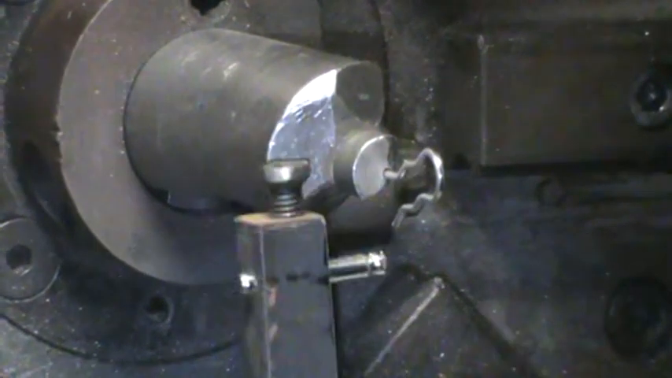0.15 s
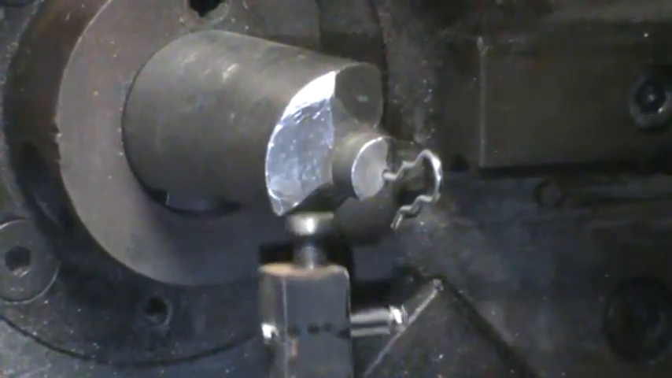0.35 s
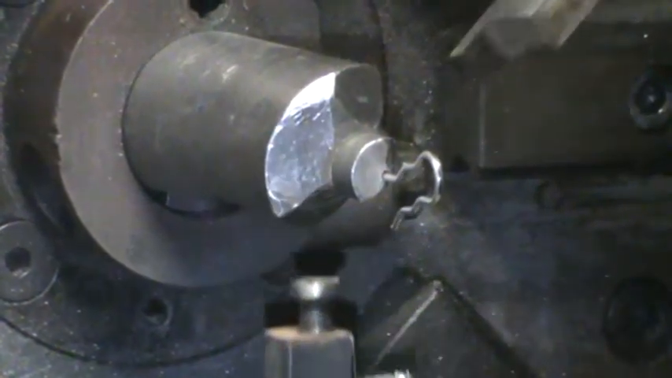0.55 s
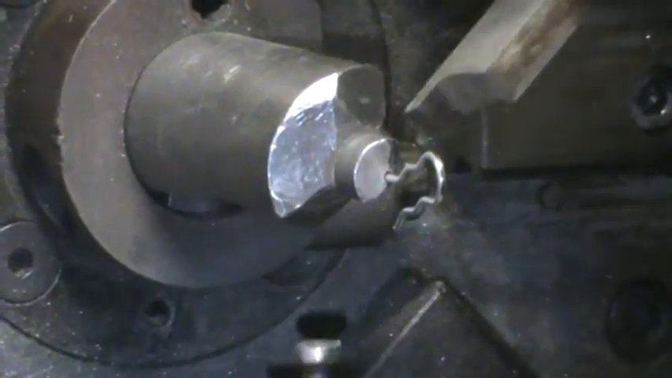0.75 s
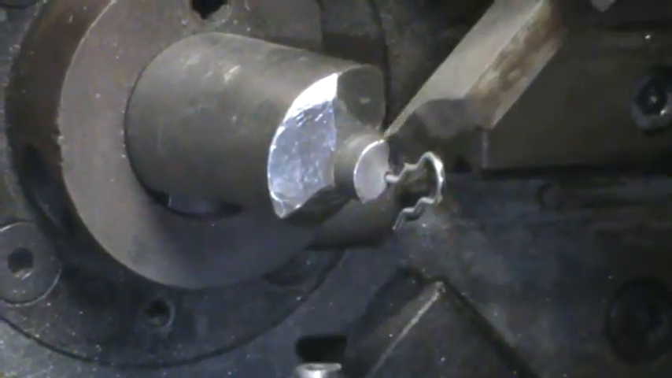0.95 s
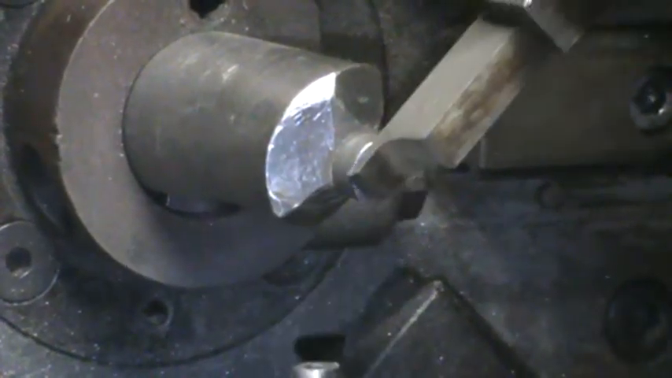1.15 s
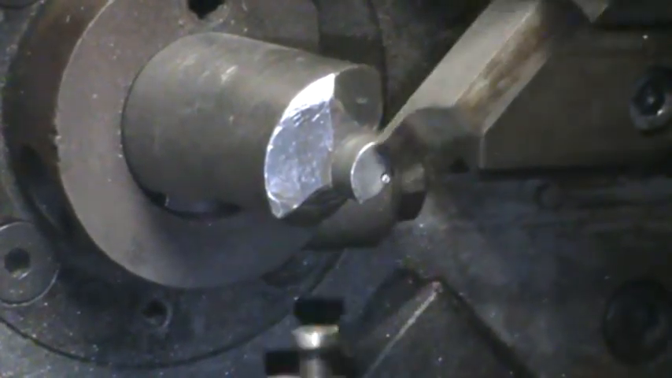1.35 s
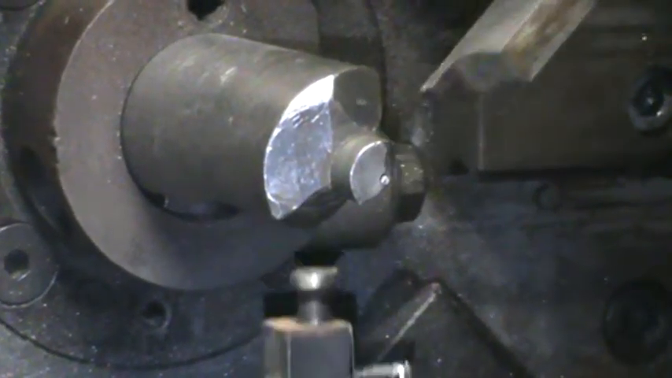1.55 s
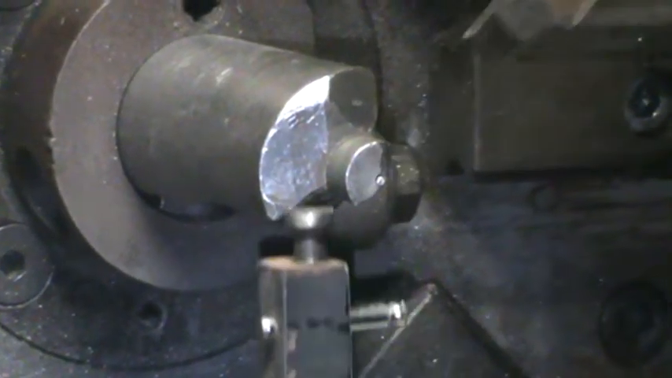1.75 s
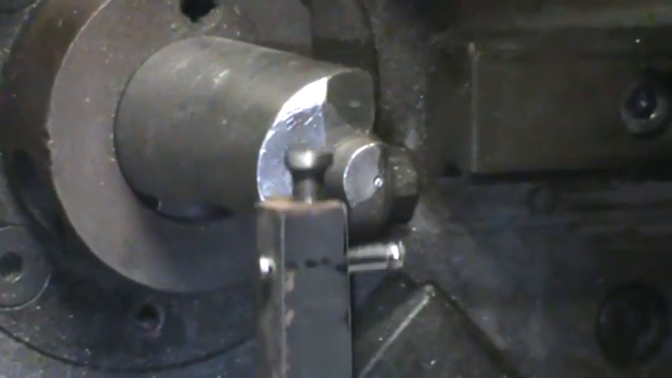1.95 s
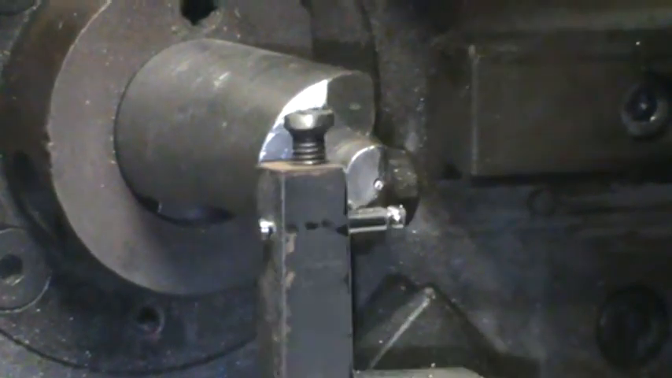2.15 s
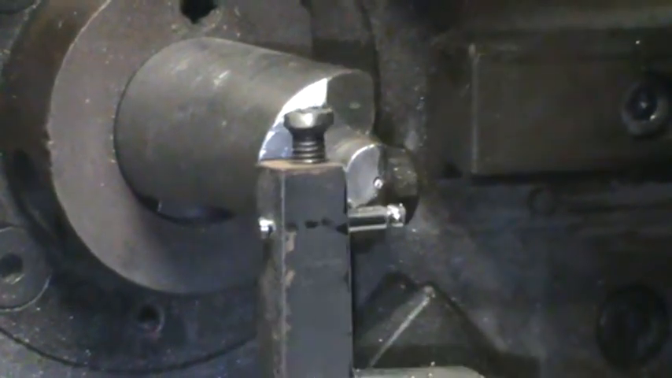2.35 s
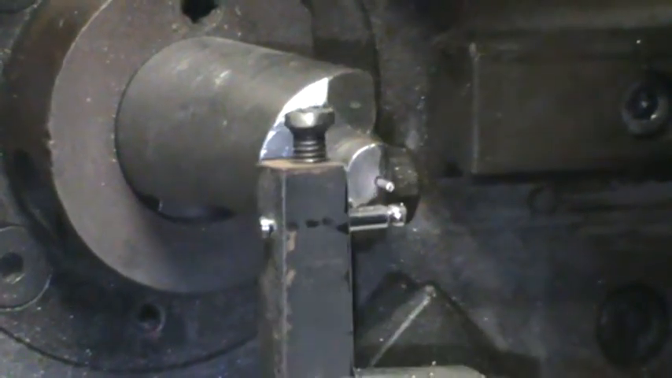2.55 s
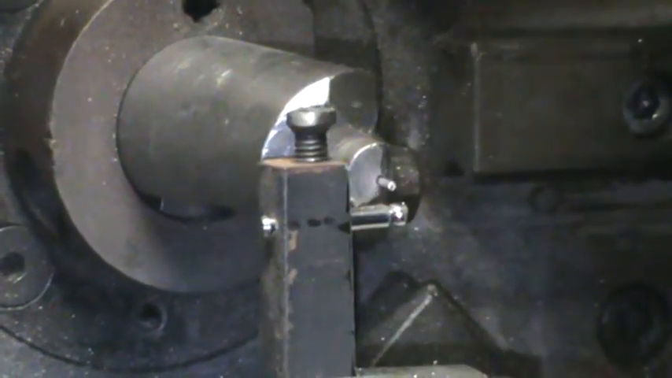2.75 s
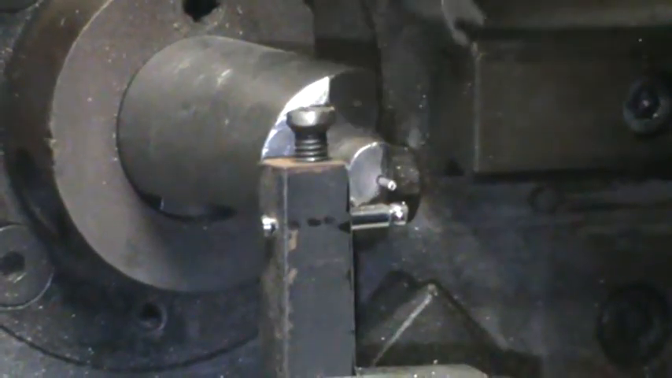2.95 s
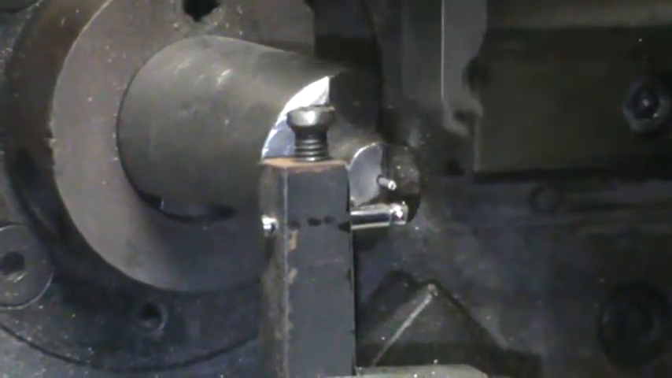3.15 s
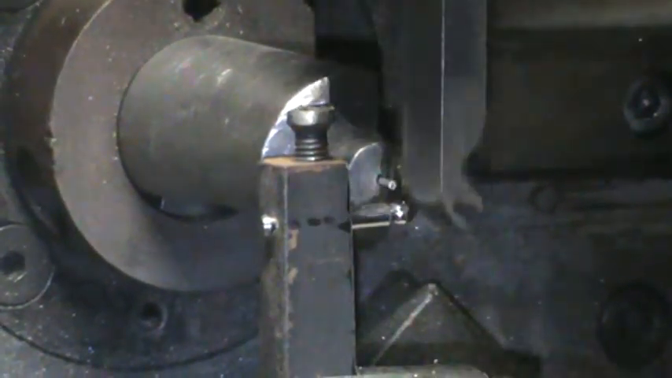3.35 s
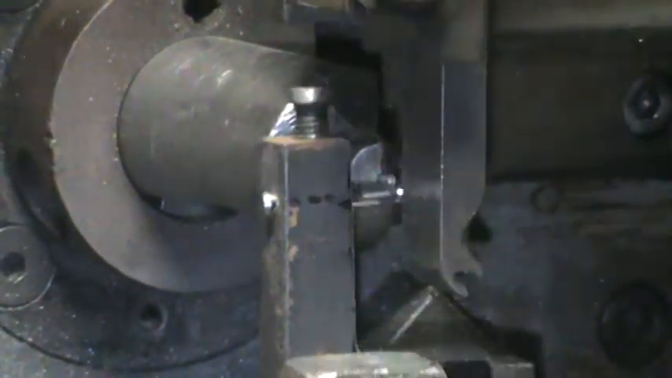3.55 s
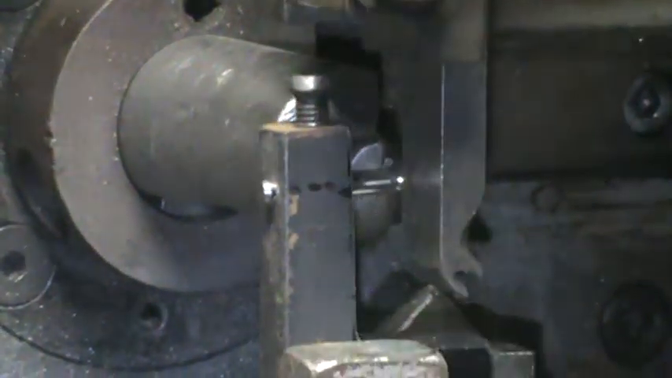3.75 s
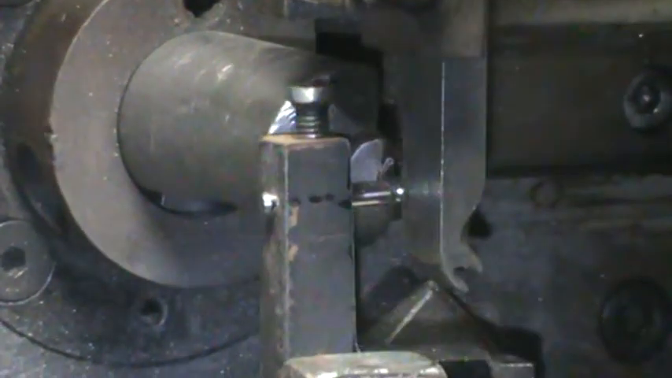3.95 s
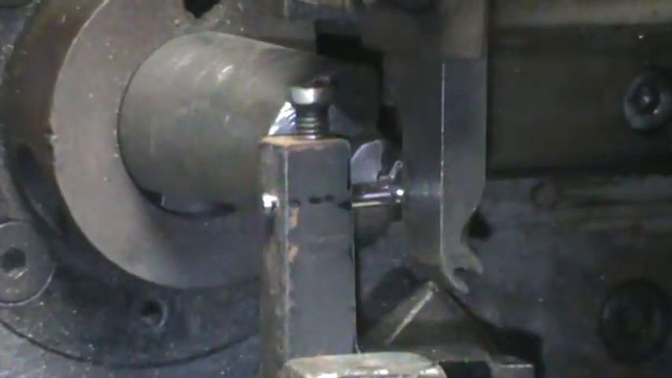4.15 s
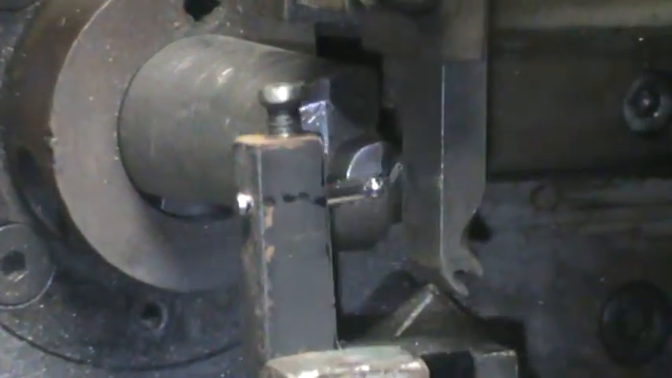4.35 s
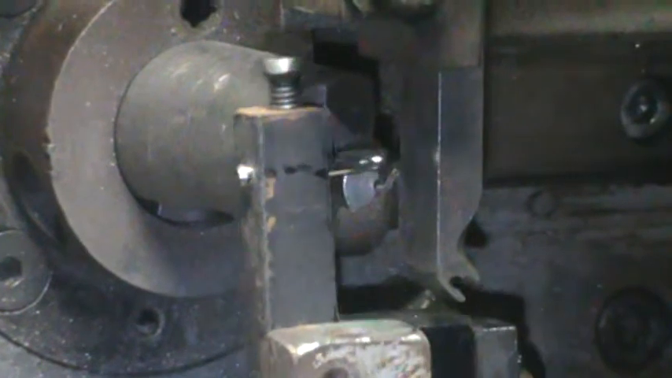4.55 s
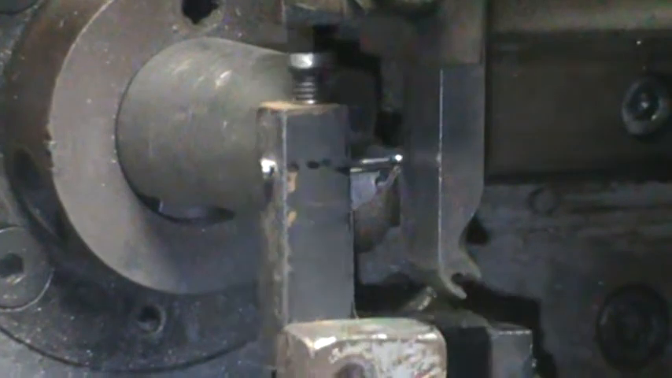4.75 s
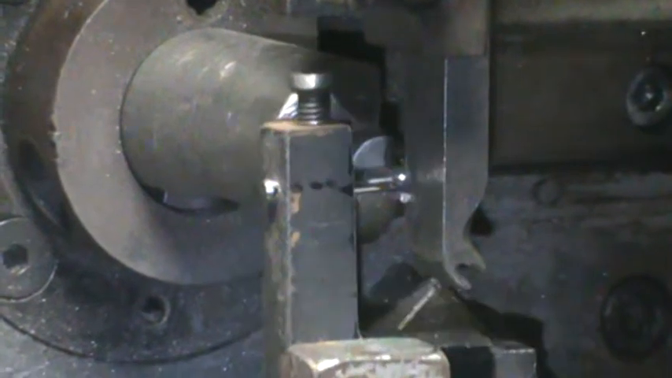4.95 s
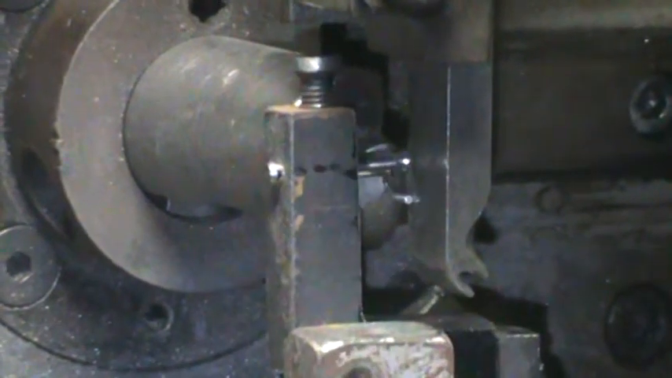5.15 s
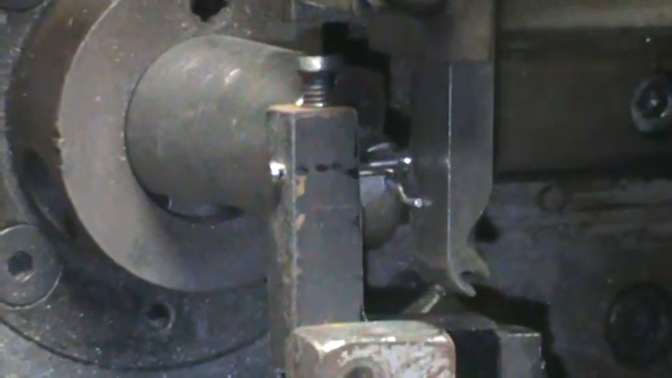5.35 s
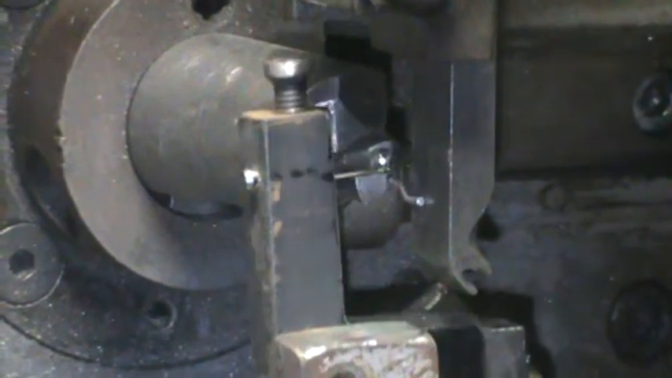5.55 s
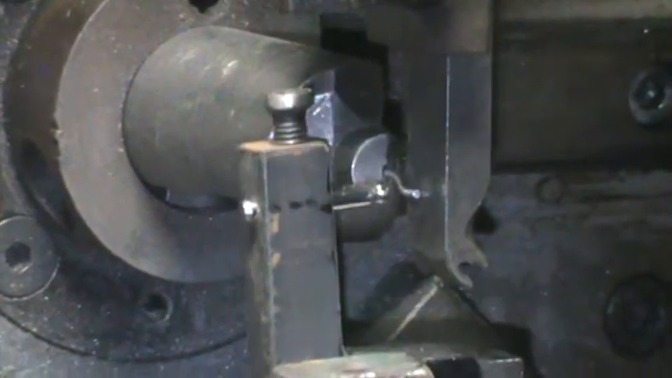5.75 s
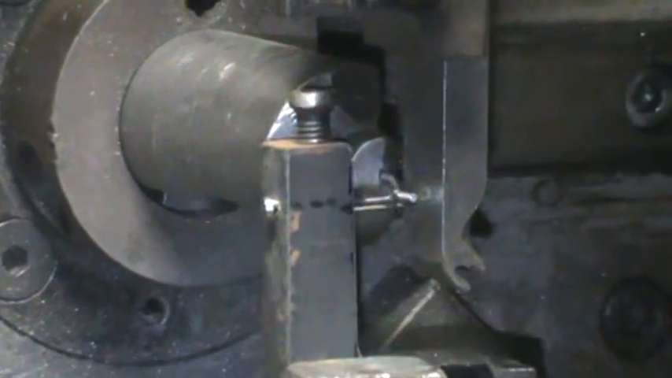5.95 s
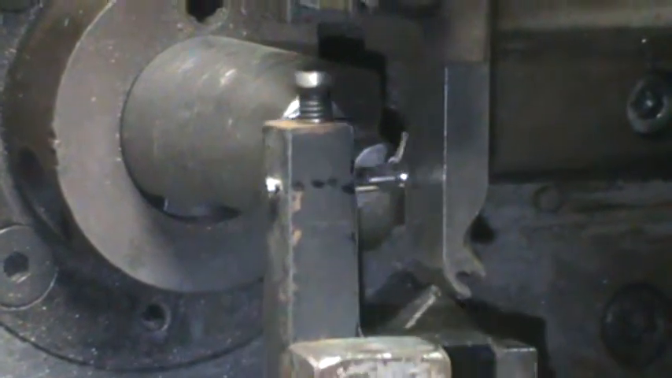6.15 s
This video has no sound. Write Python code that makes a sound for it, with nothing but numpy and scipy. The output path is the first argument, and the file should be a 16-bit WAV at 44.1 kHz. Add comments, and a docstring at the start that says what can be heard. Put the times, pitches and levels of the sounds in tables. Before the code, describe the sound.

A factory machine hums steadily, with airy fan wash and a faint high whine. After a brief quiet wire hiss, the cutter strikes very loudly, dense ringing metal spreading through the room, with two more sharp clacks close behind. A low shudder dies away slowly. Later come another soft wire hiss, low servo whirs and scattered small metallic clicks. Close stereo microphone, diffuse shop-floor echo.

```python
"""A spring-forming machine hums throughout: wavering tones for motors and drives, noise for fans and casings.
Wire hisses through its guides at the start and again later, as treble noise that follows its speed.
After a light tick the cutter shears off a part: short noise cracks, ringing steel and a dense crash.
The frame shudders and sways in a low throbbing tone while two hard clacks follow.
After the cut, servo slides growl in low-mid noise and tools tick; the workshop echoes every contact."""
import sys
import numpy as np
from scipy import signal
from scipy.fft import rfft, irfft
from scipy.io import wavfile

SR = 44100
rng = np.random.default_rng(int(sys.argv[2]) if len(sys.argv) > 2 else 0)


def bounce(signal):
    """Save signal as a 16-bit WAV file at the path given by the first command-line argument."""
    frames = np.transpose(np.atleast_2d(signal))
    limited = np.clip(frames, -1, 1)
    pcm = np.round(limited * 32767).astype(np.int16)
    wavfile.write(sys.argv[1], SR, pcm)


N = 273420
TIME = np.arange(N) / SR  # s

# Stereo spread of the running machine all around: (frequency [Hz], side minus mid [dB])
MACHINE_WIDTH = [(90, -62), (200, -19.5), (700, -7), (1300, -8.5), (4400, -3), (9000, -10.5), (15000, -8.5)]
# Stereo spread of the tools in front: (frequency [Hz], side minus mid [dB])
TOOL_WIDTH = [(100, -13), (220, -2.5), (1200, -10), (3500, -13.5), (15000, -10.5)]

# Motor hum on multiples of twice the line frequency: (multiple [-], level [dB])
HUM_TONES = [(1, -46), (2, -58.5), (4, -55.5), (5, -53.5), (6, -54), (7, -43.5), (8, -46.5), (12, -65),
             (17, -59.5), (18, -65)]
HUM_BASE_HZ = 100
# Tones of the running motors and fans, and one drive whine at 2514 Hz: (frequency [Hz], level [dB])
SHAFT_TONES = [(156, -54.5), (312, -54), (528, -53), (588, -57.5), (623, -51), (666, -59.5), (770, -63),
               (829, -57), (862, -64), (931, -61.5), (1157, -64), (1217, -68), (1254, -63), (2514, -64.5)]
# Switching whine of the servo drives: (frequency [Hz], level [dB], change per dB of load [dB])
DRIVE_WHINE = [(5000, -71, -0.44), (10020, -68.5, -1.3), (14400, -81, .5), (15000, -69.5, 0.8)]
# Load on the servo drives, highest in the long bend: (time [s], load [dB])
DRIVE_LOAD = [(0, -1), (1, 1), (2.2, -3), (3, 0), (4.2, 2), (4.87, 12), (5.4, 0), (6.2, 1)]

# Fans and workshop: (frequency [Hz], relative density [dB])
FAN_SPECTRUM = [(20, -36), (36, -5.5), (60, 4), (125, -4.5), (300, -4), (430, -3), (750, -2), (1050, -8),
                (1400, -11), (2100, -15.5), (3100, -23), (7000, -30.5), (10500, -27.5), (13500, -36)]
FAN_LEVEL_DB = -43
# Resonances that the running drives keep sounding: (frequency [Hz], width [Hz], level [dB])
CASING_RESONANCES = [(1712, 213, -51.5), (9360, 540, -59), (14800, 250, -68.5)]
# Slide strokes, growling most at top speed: (time of top speed [s], length [s], peak level [dB])
SLIDE_STROKES = [(2.55, 0.33, -44), (4.03, .24, -45.5), (4.25, 0.4, -43.5), (4.67, .24, -41),
                 (5.23, 0.56, -42.5), (5.52, .26, -42), (5.92, 0.28, -43)]
# Servo growl: (frequency [Hz], relative density [dB])
GROWL_SPECTRUM = [(130, -17), (205, 16), (270, 13.5), (340, 13.5), (600, -36.5)]
GROWL_IDLE_DB = -54  # servos holding their places
# Wire and slides rubbing through guides: (time of top speed [s], length [s], peak level [dB])
FEED_STROKES = [(.038, 0.09, -52), (.3, 0.66, -59), (3.1, 1.8, -58.5), (3.165, .1, -53), (3.28, .14, -58),
                (4.28, .3, -61)]
# Rub in the guides: (frequency [Hz], relative density [dB])
RUB_SPECTRUM = [(1200, -28), (3000, -3), (5000, 2.5), (8000, -1.5), (12000, -5), (16000, -6)]
RUB_FLOOR_DB = -65  # guides between strokes

# Tools touching the wire: (time [s], level [dB], treble tilt [dB/octave], t60 [s],
# ring [dB], pitch around which the struck spot rings [Hz])
WIRE_TICKS = [(1.0404, -36, 0, 0.1, -5, 2200), (2.0007, -39.5, 0, 0.032, -11, 3500),
              (2.3422, -40, -2, .025, -6, 3780), (2.8715, -44, 1, .02, -10, 4600),
              (3.2875, -43, 1.5, 0.023, -4, 4600), (3.5659, -33.5, 1, 0.054, -6, 4500),
              (3.7934, -44.5, 2, .05, -3, 4600), (3.815, -50, 6, .05, -10, 7700),
              (4.189, -40, -3, 0.046, 2, 1510), (4.207, -42, 6, .045, 0, 1510),
              (4.2352, -42, 5, .06, 1, 4620), (4.8513, -33.5, 0, .035, -10.5, 2870),
              (4.986, -40, -4.5, .12, -8, 1500), (5.0165, -32.5, -1.5, 0.037, -2, 5900),
              (5.036, -48, 7, .06, -9, 6000), (5.4433, -31.5, -5, .035, -4, 1520),
              (5.454, -49, 9, .025, -1, 2170)]
# Crack of a light contact: (frequency [Hz], relative density [dB])
TICK_SPECTRUM = [(300, -21), (700, 8), (1100, -4), (1600, 4.5), (2300, -1.5), (3100, -8), (4600, -4),
                 (6500, -8.5), (10000, -5), (14000, -16), (16000, -18)]
# Blows of the cutter and its slide: (time [s], level [dB], treble tilt [dB/octave], t60 [s],
# ring [dB], pitch around which the struck spot rings [Hz])
CUTTER_BLOWS = [(1.079, -12, -0.5, 0.021, -4.5, 1880), (1.0852, -18.5, 8, 0.06, -19, 7700),
                (1.3548, -12.5, 0.5, 0.054, -9, 1900), (1.3625, -18, -2.5, 0.092, -23, 2900),
                (1.4935, -15, -2, 0.058, -4, 2950), (1.5005, -20.5, 0, 0.049, -8, 4170)]
# Crack of a hard blow: (frequency [Hz], relative density [dB])
BLOW_SPECTRUM = [(88, -33), (150, -9), (406, -15), (649, -7), (1480, -12), (1660, -1), (2060, -8.5),
                 (2980, -4), (3620, -9.5), (4240, -6), (14800, -21.5), (16000, -43)]
# Ringing modes of the tool steel: (frequency [Hz], level [dB], t60 [s])
STEEL_MODES = [(1510, -1, 0.046), (1960, -6, 0.095), (2180, 0, 0.099), (2740, -6, 0.16), (3030, -6, 0.13),
               (3515, -1, 0.068), (4120, -5, 0.11), (4640, -16, 0.36), (5800, -16, 0.085), (8040, -9, .18),
               (11300, -12, 0.28)]
# Decay of the workshop echo: (frequency [Hz], t60 [s])
ROOM_DECAY = [(150, 1), (1000, 0.45), (3000, 0.53), (6000, 0.38), (12000, 0.43)]

# The machine's crowded steel modes set ringing by the cut: (frequency [Hz], relative density [dB])
CRASH_SPECTRUM = [(90, -7), (135, 3), (180, -13), (260, -5), (450, -5.5), (680, 0.5), (830, 8),
                  (1100, -3.5), (1850, 4), (3700, -3.5), (5100, -1), (6200, -7.5), (10300, -6.5),
                  (12500, -16.5), (16000, -22)]
# Their decay: (frequency [Hz], t60 [s])
CRASH_DECAY = [(200, 1.0), (900, 0.96), (2000, 1), (5000, 0.92), (9000, 0.65), (14000, 0.4)]
CRASH_START_S, CRASH_LEVEL_DB, CRASH_RISE_S = 1.083, -13, 0.0057

# Swells of the heavy frame rocking on its feet: (time of peak [s], length [s], peak level [dB])
FRAME_SWELLS = [(1.195, 0.21, -16.5), (1.44, 0.3, -34.5), (3.27, 1, -46.5)]
# Panels shaken along with the frame: (frequency [Hz], level against the rocking [dB])
PANEL_MODES = [(131, -18.5), (248, -24.5), (272, -22)]
FRAME_LOWEST_HZ = 60.5
# The frame keeps swaying after the cut, and the sway throbs as it dies
SWAY_LEVEL_DB, SWAY_T60_S = -36.5, 3.9
THROB_RATE_HZ, THROB_DEPTH = 6, 0.3

BAND_EDGE_HZ = 15900


def amp(db):
    """Decibels to gain."""
    return 10 ** (np.asarray(db) / 20)


def unit(x):
    """Scales to rms 1."""
    return x / np.sqrt(np.mean(x ** 2) + 1e-20)


def fade(t, t60):
    """Exponential decay by 60 dB in t60 seconds."""
    return np.exp(-np.log(1000) * t / t60)


def at_hz(points, hz):
    """Reads a spectrum on a log-frequency axis."""
    f, value = np.transpose(points)
    return np.interp(np.log(hz + 1), np.log(f + 1), value)


def curve(rows):
    """Reads a control at every sample."""
    return np.interp(TIME, *np.transpose(rows))


def add(mix, s, sound):
    """Mixes a sound in at time s, cut off at the end of the mix."""
    part = mix[:, round(s * SR):][:, :sound.shape[1]]
    part += sound[:, :part.shape[1]]


def drift(rate_hz):
    """Random wander of rms 1, rolled off around rate_hz."""
    hz = np.fft.rfftfreq(N, 1 / SR)
    spectrum = rfft(rng.standard_normal(N)) * np.exp(-(hz / rate_hz) ** 2)
    return unit(irfft(spectrum, N))


def noise(gain, size=N, width=MACHINE_WIDTH):
    """Stereo noise of rms 1 with the spectrum gain(hz) and a width for each band."""
    hz = np.fft.rfftfreq(size, 1 / SR)
    mid, side = rfft(rng.standard_normal((2, size)))
    side = side * amp(at_hz(width, hz))
    left_right = np.array([mid + side, mid - side])
    return unit(irfft(left_right * gain(hz), size))


def coloured(points):
    """Noise with a smooth spectrum."""
    return noise(lambda hz: amp(at_hz(points, hz)))


def resonant(centre_hz, width_hz):
    """Noise singing in one steep-sided resonance."""
    return noise(lambda hz: 1 / (1 + (2 * (hz - centre_hz) / width_hz) ** 4) ** .5)


def tone(hz, wander, flutter_db, rate_hz):
    """A line whose phase [rad] and level waver; higher ones differ more in phase between sides, up to a limit."""
    apart = min(hz / 6000, .2) * np.array([[1], [-1]])
    phase = 2 * np.pi * (hz * TIME + rng.random()) + wander * drift(rate_hz)
    return np.sqrt(2) * np.sin(phase + apart) * amp(flutter_db * drift(rate_hz))


def stroke(peak_s, length_s):
    """A smooth move: speeds up from rest, peaks, and brakes to rest."""
    return np.cos(np.pi * np.clip((TIME - peak_s) / length_s, -.5, .5)) ** 2


def strokes(rows):
    """Gain of a series of smooth moves."""
    return sum(amp(db) * stroke(s, length) for s, length, db in rows)


def crowded(hz, depth_db, spacing_hz):
    """Random peaks and valleys of many close modes."""
    grid = np.arange(0, SR, spacing_hz)
    heights = rng.standard_normal(SR)[:len(grid)]
    return amp(depth_db * np.interp(hz, grid, heights))


def dying(x, lives):
    """Lets each band of x fade with its own t60."""
    hz, t, bands = signal.stft(x, SR, nperseg=256)
    t60 = at_hz(lives, hz)[:, None]
    return signal.istft(bands * fade(t, t60), SR, nperseg=256)[1]


def motors():
    """Steady mains hum, looser shaft tones, and a whine that shifts in level with the drives' load."""
    hum = sum(amp(db) * tone(k * HUM_BASE_HZ, wander=.08, flutter_db=-0.14, rate_hz=11)
              for k, db in HUM_TONES)
    shafts = sum(amp(db) * tone(hz, wander=0.47, flutter_db=1, rate_hz=3.4) for hz, db in SHAFT_TONES)
    load_db = curve(DRIVE_LOAD)
    whine = sum(amp(db + share * load_db) * tone(hz, wander=.35, flutter_db=1.5, rate_hz=16)
                for hz, db, share in DRIVE_WHINE)
    return hum + shafts + whine


def fan_wash():
    """Broad air noise whose level flutters slightly."""
    return amp(FAN_LEVEL_DB + .5 * drift(28)) * coloured(FAN_SPECTRUM)


def casings():
    """Resonances fed with noise, each wavering in level on its own."""
    return sum(amp(db + 1.0 * drift(66)) * resonant(hz, width) for hz, width, db in CASING_RESONANCES)


def guide_rub():
    """Rough treble noise of wire and slides in their guides, louder as they move faster."""
    level = np.hypot(amp(RUB_FLOOR_DB), strokes(FEED_STROKES))
    roughness = amp(1.6 * drift(120))
    return level * roughness * coloured(RUB_SPECTRUM)


def servo_growl():
    """Low-mid noise that swells with each slide's speed over the growl of holding still."""
    return np.hypot(amp(GROWL_IDLE_DB), strokes(SLIDE_STROKES)) * coloured(GROWL_SPECTRUM)


def workshop(x):
    """Diffuse echo of the shop floor: noise that builds up quickly, then dies band by band."""
    tail = dying(noise(np.ones_like, size=SR, width=TOOL_WIDTH), ROOM_DECAY)
    tail *= 1 - np.exp(-np.arange(tail.shape[1]) / SR / 0.0042)
    tail /= np.linalg.norm(tail[0])
    return signal.fftconvolve(x.mean(0)[None], tail, axes=1)[:, :N]


def steel_mode(hz, t):
    """Clamped parts split a mode into a beating cluster of three."""
    detune, phase = rng.uniform(-1, 1, (2, 3, 1))
    lines = np.sin(2 * np.pi * (hz * (1 + .03 * detune) * t + phase))
    return lines.sum(0) / np.sqrt(3)


def strikes(rows, spectrum, room_db, spread=0.19, others_db=-13):
    """Each contact is a crack of crowded short modes that fills the room, then the ring of the tool steel."""
    cracks, rings = np.zeros((2, N)), np.zeros((2, N))
    t = np.arange(SR // 2) / SR
    onset = 1 - np.exp(-t / 0.00045)
    for s, db, tilt_db, t60, ring_db, spot_hz in rows:
        def crack_gain(hz):
            colour = amp(at_hz(spectrum, hz) + tilt_db * np.log2(hz / 3000 + .1))
            return colour * crowded(hz, depth_db=1.8, spacing_hz=130)

        crack = noise(crack_gain, size=len(t), width=TOOL_WIDTH)
        add(cracks, s, amp(db) * onset * crack * fade(t, t60))
        for hz, mode_db, life in STEEL_MODES:
            # the struck spot favours modes within a fraction of an octave (spread) of its own pitch
            favour = amp(others_db) + np.exp(-(np.log2(hz / spot_hz) / spread) ** 2)
            gain = amp(db + ring_db + mode_db) * favour
            ring = gain * onset * steel_mode(hz, t) * fade(t, life)
            add(rings, s, ring[None])
    return cracks + rings + amp(room_db) * workshop(cracks)


def wire_ticks():
    """Tools touch the wire: light cracks and the ring of the steel."""
    return strikes(WIRE_TICKS, TICK_SPECTRUM, room_db=-5.5)


def cutter_blows():
    """The cutter and its slide strike hard, cracking and ringing the steel."""
    return strikes(CUTTER_BLOWS, BLOW_SPECTRUM, room_db=-6.0)


def crash(hold_s=0.013):
    """The sheared wire lets go: the steel swells for a moment, then rings out, its top dying first."""
    def mode_gain(hz):
        return amp(at_hz(CRASH_SPECTRUM, hz)) * crowded(hz, depth_db=2.4, spacing_hz=35)

    ring = dying(noise(mode_gain, size=SR, width=TOOL_WIDTH), CRASH_DECAY)
    t = np.arange(ring.shape[1]) / SR
    swell = (1 - np.exp(-t / CRASH_RISE_S)) * (1 - 0.29 * np.exp(-t / hold_s))
    out = np.zeros((2, N))
    add(out, CRASH_START_S, amp(CRASH_LEVEL_DB) * swell * ring)
    return out


def frame(lean_db=2.0):
    """The frame rocks in its lowest mode and shakes its panels; a hard shake leans to the right."""
    age = np.maximum(TIME - FRAME_SWELLS[0][0], 0)  # s since the first swell's peak
    throb = 1 + THROB_DEPTH * np.cos(2 * np.pi * THROB_RATE_HZ * age)
    sway = (age > 0) * amp(SWAY_LEVEL_DB) * throb * fade(age, SWAY_T60_S)
    level = np.hypot(strokes(FRAME_SWELLS), sway)
    shaken = np.clip(level / amp(-34), 0, 1)  # full lean from -34 dB up
    sides = amp(lean_db * shaken * np.array([[-1], [1]]))
    rocking = tone(FRAME_LOWEST_HZ, wander=.35, flutter_db=.8, rate_hz=7)
    panels = sum(amp(db) * tone(hz, wander=0.99, flutter_db=-0.5, rate_hz=19) for hz, db in PANEL_MODES)
    return level * (rocking * sides + panels)


def scene():
    """The running machine, its cut and its ticks, in the workshop."""
    running = motors() + fan_wash() + casings() + guide_rub() + servo_growl()
    contacts = wire_ticks() + cutter_blows()
    return running + contacts + crash() + frame()


def record(dry):
    """Band limit: a steep low-pass filter takes off the extreme treble."""
    lowpass = signal.firwin(511, BAND_EDGE_HZ, window=("kaiser", 9), fs=SR)
    return signal.oaconvolve(dry, lowpass[None], "same")


dry = scene()
out = record(dry)
bounce(out)
```